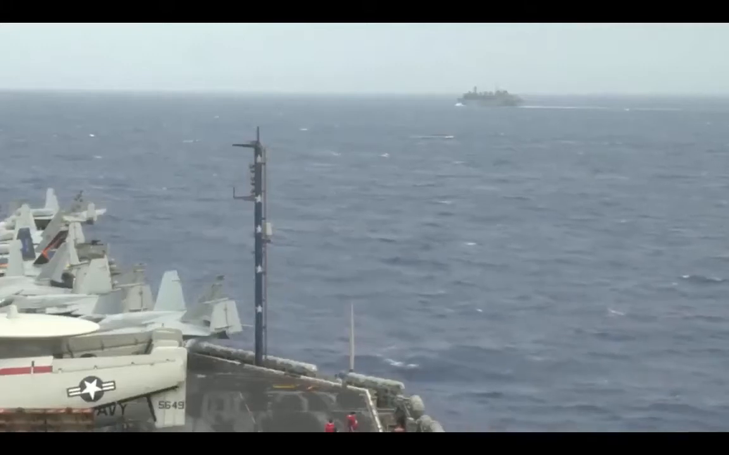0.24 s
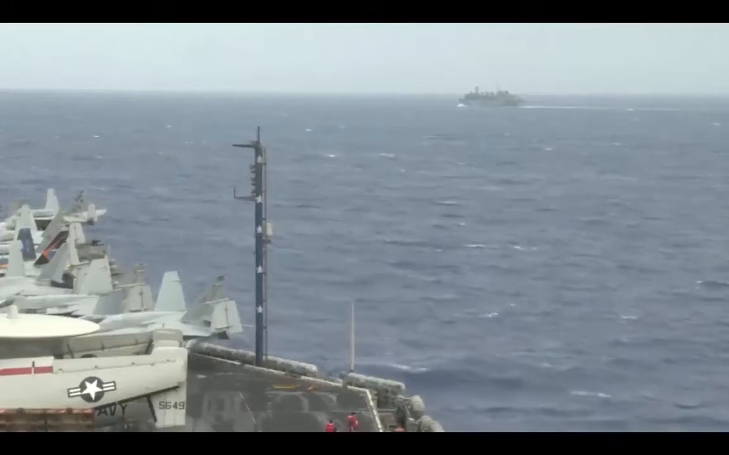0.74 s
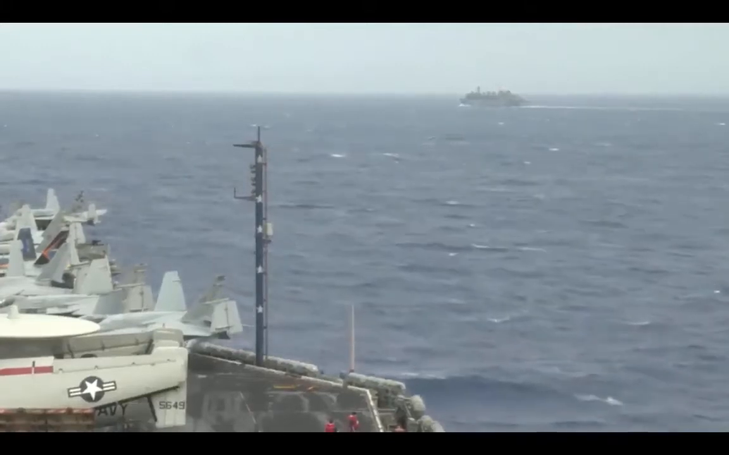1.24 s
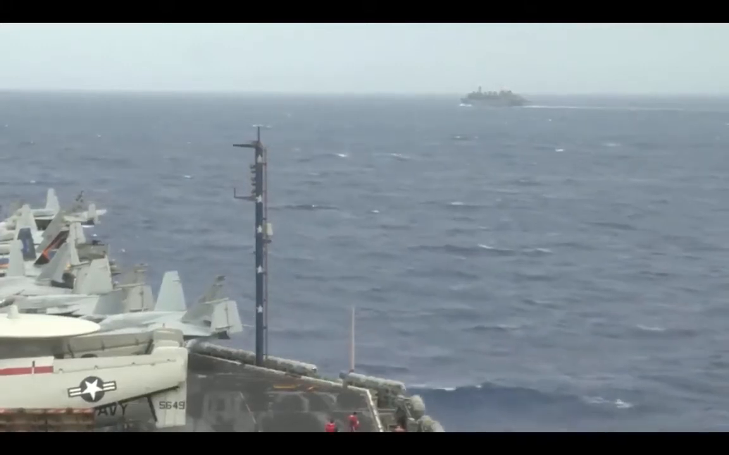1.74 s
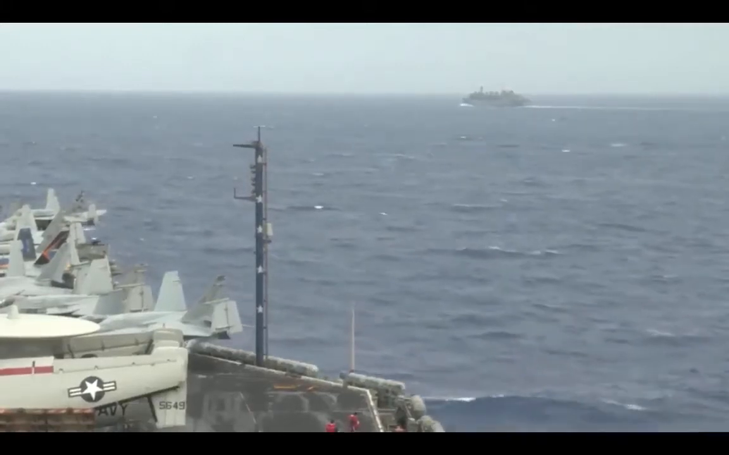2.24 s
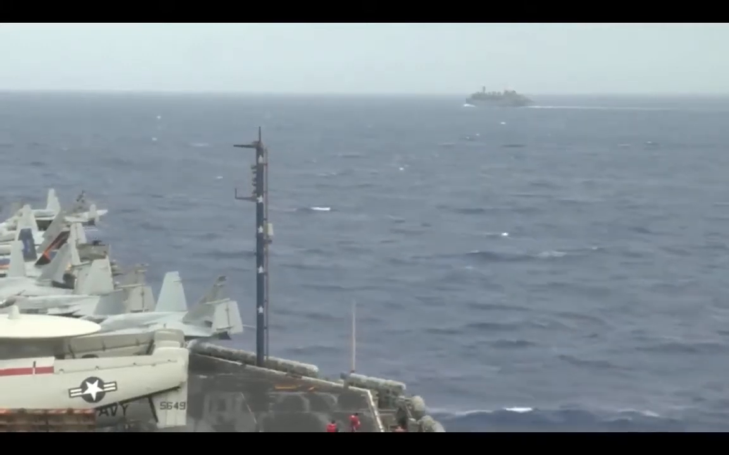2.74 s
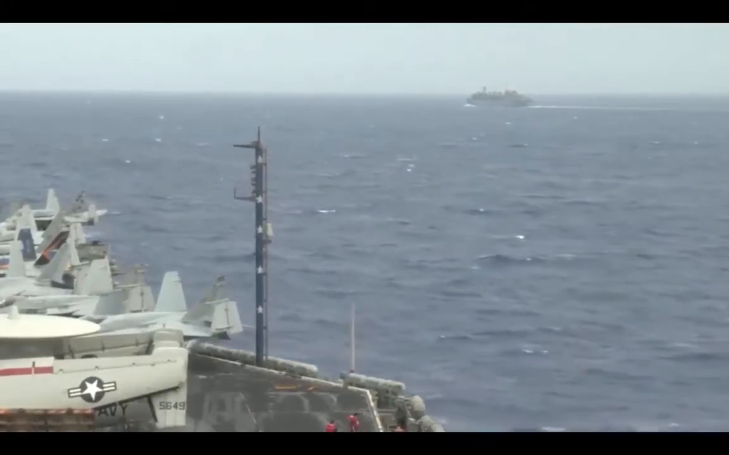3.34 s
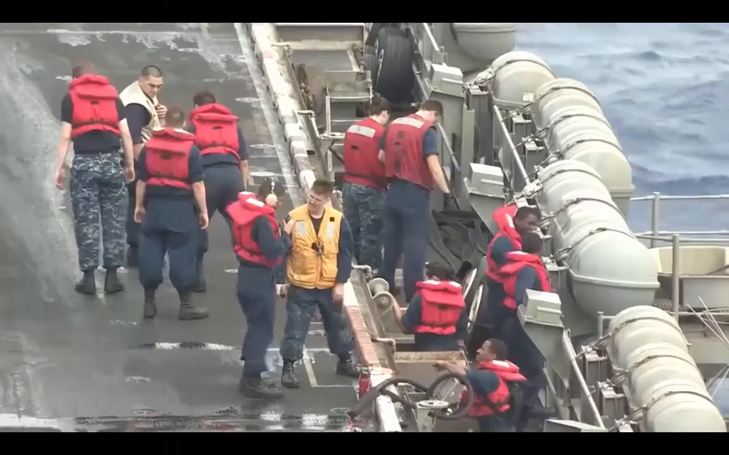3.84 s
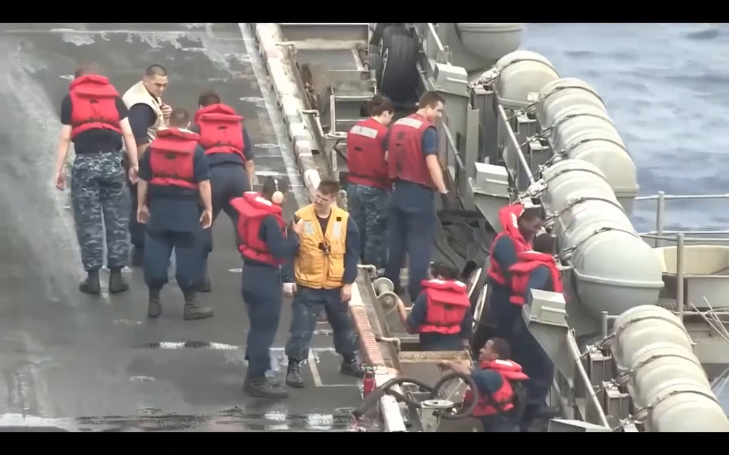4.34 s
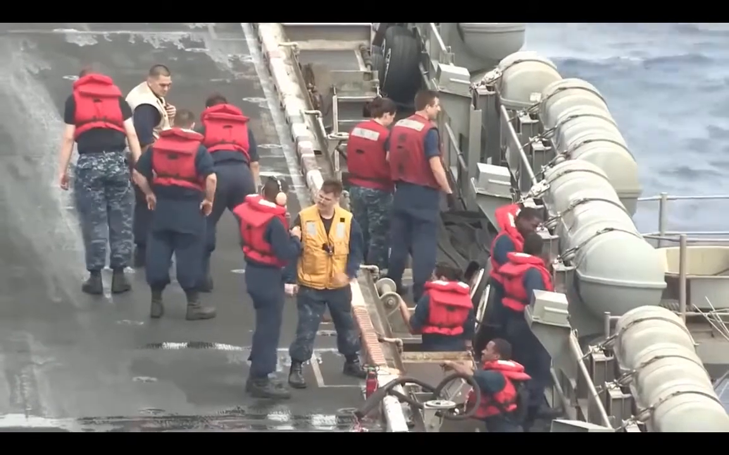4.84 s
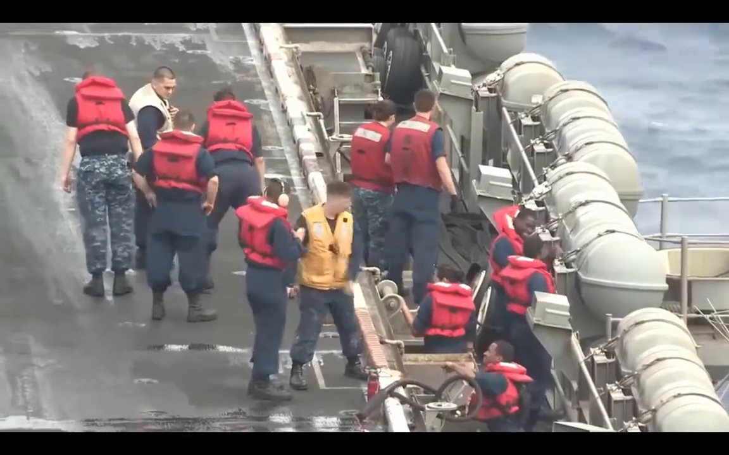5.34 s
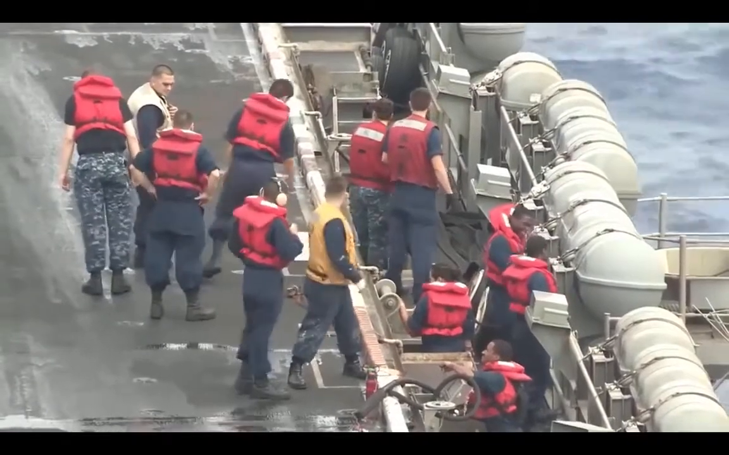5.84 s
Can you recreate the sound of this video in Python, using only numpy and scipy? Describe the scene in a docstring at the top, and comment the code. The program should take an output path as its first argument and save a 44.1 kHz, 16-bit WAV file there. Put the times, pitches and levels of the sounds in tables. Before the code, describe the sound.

Loud, gusty wind batters the microphone on a ship's deck, then gives way to soft rushing water and a faint hull hum.

```python
"""Strong wind on the deck of a ship under way batters a microphone. From the start, turbulent eddies
rumble, flutter and hiss on its grille; the biggest thump the diaphragm, and the stream tears off in
rough flaps. Near 3.85 s the scene changes, with a faint tick, to a sheltered spot where the sea rushes
along the humming hull. There a light wind eases, returns near 4.85 s with a soft puff and a second
tick, drops again under a faint, high swish, and builds with another puff near 5.7 s."""
import sys
import numpy as np
from scipy import signal
from scipy.fft import rfft, irfft
from scipy.io import wavfile
from scipy.ndimage import uniform_filter1d

SR = 44100
rng = np.random.default_rng(int(sys.argv[2]) if len(sys.argv) > 2 else 0)


def dump(signal):
    """Clip the signal to [-1, 1] and save it as 16-bit WAV at the path in sys.argv[1]."""
    limited = np.clip(np.atleast_2d(signal).T, -1, 1)
    pcm = np.round(limited * 32767).astype(np.int16)
    wavfile.write(sys.argv[1], SR, pcm)


N = 267990
TIME = np.arange(N) / SR
BIN_HZ = np.maximum(np.arange(N // 2 + 1) * SR / N, 1)

# Spectrum of the open wind. Each row: frequency in Hz, relative spectral density in dB.
GALE_SPECTRUM = [(20, -32), (45, -8), (85, -0.5), (160, -2.5), (290, -5.5), (400, -9.5), (600, -17.5),
                 (1500, -32.5), (2600, -38), (4200, -43.5), (6500, -50), (12000, -61.5), (15500, -70)]


def undb(db):
    """Amplitude ratio of a level in decibels."""
    return 10 ** (np.asarray(db) / 20)


def curve(table):
    """Linear interpolation of (time, value) rows at every sample."""
    return np.interp(TIME, *np.transpose(table))


def colour(spectrum):
    """Gain per frequency, interpolated from (Hz, dB) rows on logarithmic axes."""
    hz, db = np.transpose(spectrum)
    return undb(np.interp(np.log(BIN_HZ), np.log(hz), db))


def filtered(x, gain):
    """Linear filtering: the spectrum is multiplied by a gain per frequency."""
    return irfft(rfft(x) * gain, N)


def noise(gain):
    """Filtered Gaussian noise of rms 1."""
    x = filtered(rng.standard_normal(N), gain)
    return x / np.sqrt(np.mean(x ** 2))


def walk(rate_hz):
    """Random modulation of rms 1, band-limited to about the given rate."""
    return noise(1 / (1 + (BIN_HZ / rate_hz) ** 4))


def below(hz):
    """Fourth-order low-pass gain."""
    return 1 / np.sqrt(1 + (BIN_HZ / hz) ** 8)


def above(hz):
    """High-pass gain, complementary in power to the low-pass."""
    return np.sqrt(1 - below(hz) ** 2)


def steady(x, samples=1900):
    """Division by the running rms removes slow swells and keeps fast fluctuations."""
    return x / np.sqrt(uniform_filter1d(uniform_filter1d(x ** 2, samples), samples))


def swells(rows, attack_s=0.013, release_s=0.0022):
    """Envelope of (start, length, height) rows: linear rise, hold, exponential decay."""
    envelope = np.zeros(N)
    for start, length, height in rows:
        rise = np.clip((TIME - start) / attack_s + .5, 0, 1)
        envelope += height * rise * np.exp(-np.maximum(TIME - start - length, 0) / release_s)
    return envelope


def hull_drone():
    """Forced vibration: machinery shakes the hull, which hums unsteadily in narrow bands."""
    # Each row: centre in Hz, width in Hz, level in dB.
    bands = [(81, 11, -49), (151, 34, -50.5), (189, 14, -53.5), (260, 35, -49.5), (308, 20, -60),
             (402, 20, -53.5), (444, 32, -49), (558, 18, -55), (678, 37, -57.5), (863, 22, -60.5),
             (1134, 18, -62), (1567, 60, -68), (2450, 62, -68.5)]
    density = sum(undb(2 * db) / width / (1 + (2 * (BIN_HZ - hz) / width) ** 4)
                  for hz, width, db in bands)
    power = sum(undb(2 * db) for _, _, db in bands)
    return noise(np.sqrt(density)) * np.sqrt(power)


def sea(wash_db=1.3, froth_db=0.5, spray_hz=5200, flicker_db=.9, spray_follow=.4):
    """Flow noise: water washes and froths along the hull; its fine spray hangs on and swells less."""
    # Each row: time in seconds, level of the water in dB.
    levels = [(3.85, -40.5), (4.05, -42.5), (4.26, -39), (4.41, -40.5), (4.46, -44.5), (4.52, -39.5),
              (4.68, -42.5), (5.28, -43), (5.36, -41), (5.51, -42), (5.69, -45), (5.75, -42), (5.81, -48),
              (5.87, -41.5), (6.08, -47.5)]
    # Each row: frequency in Hz, relative spectral density in dB.
    spectrum = [(20, -38), (50, -31), (76, -8), (110, -3.5), (260, 1.5), (450, -2), (700, -3.5),
                (1050, -10.5), (1700, -12), (2500, -16.5), (4200, -22), (9000, -36), (10700, -39),
                (13000, -42), (15500, -47.5)]
    sea_db = curve(levels)
    water = steady(noise(colour(spectrum)) * undb(wash_db * walk(28) + froth_db * walk(400)))
    spray = filtered(water, above(spray_hz))
    spray_db = flicker_db * walk(16) - (1 - spray_follow) * (sea_db - sea_db.mean())
    return (water + spray * (undb(spray_db) - 1)) * undb(sea_db)


def swish(peak_s=5.607, spread_s=.028, centre_hz=12600, width_hz=2200, level_db=-77):
    """Band-limited noise under a Gaussian envelope is heard as one faint, very high hiss."""
    band = noise(1 / (1 + (2 * (BIN_HZ - centre_hz) / width_hz) ** 4))
    return band * undb(level_db) * np.exp(-.5 * ((TIME - peak_s) / spread_s) ** 2)


def ticks(decay_s=0.00013):
    """A step that dies at once has a broad spectrum and is heard as a tick: one as the scene changes, one later
    in the shelter."""
    # Each row: time in seconds, peak level in dB.
    steps = [(3.8435, -37), (4.8613, -34.5)]
    return sum(undb(db) * np.sign(TIME - s) * np.exp(-np.abs(TIME - s) / decay_s) for s, db in steps)


def breeze(churn_db=2.5):
    """Weak turbulence: light wind builds and eases as low-pitched pressure noise at the microphone."""
    # Each row: time in seconds, level of the wind in dB.
    levels = [(3.85, -39), (4.1, -43.5), (4.45, -50), (4.82, -57), (4.9, -36.5), (5.0, -39.5), (5.2, -35.5),
              (5.29, -34.5), (5.35, -49), (5.44, -43), (5.5, -52), (5.58, -48), (5.69, -45), (5.72, -34.5),
              (5.87, -32.5), (5.96, -33.5), (6.01, -40.5), (6.06, -32.5)]
    # Each row: frequency in Hz, relative spectral density in dB.
    spectrum = [(20, -6), (45, -4), (70, -3.5), (110, 0.5), (200, 0), (300, -5.5), (550, -10.5),
                (1000, -21.5), (2000, -34), (6000, -58), (15500, -80)]
    return steady(noise(colour(spectrum)) * undb(churn_db * walk(26))) * undb(curve(levels))


def puffs(spread_s=0.018):
    """Forced oscillation: slow eddies in the shelter rock the diaphragm for a few soft cycles."""
    # Each row: time in seconds, peak level in dB, swing frequency in Hz.
    eddies = [(4.85, -32.5, 113), (5.735, -30.5, 103.2)]
    pressure = np.zeros(N)
    for (s, db, hz), phase in zip(eddies, rng.random(len(eddies))):
        envelope = np.exp(-.5 * ((TIME - s) / spread_s) ** 2)
        pressure += undb(db) * envelope * np.sin(2 * np.pi * (hz * TIME + phase))
    return pressure


def lulls(onset_s=0.043, recovery_s=0.012):
    """Attenuation in dB as the flow stalls: the air speed sags slowly and snaps back."""
    # Each row: time of the extreme in seconds, depth in dB (negative for a lift).
    dips = [(.15, 1.5), (.87, 0.5), (0.995, 3), (1.34, -1.5), (1.655, 0), (2.136, 6.5), (2.405, 7),
            (3.697, 4.5), (3.838, 3.5), (5.455, 4.5)]
    return sum(db * np.exp(-((TIME - s) / np.where(TIME < s, onset_s, recovery_s)) ** 2)
               for s, db in dips)


def shelter():
    """Superposition out of the gale: sea, breeze and drone dip together under the puffs and swish."""
    return (sea() + breeze() + hull_drone()) * undb(-lulls()) + puffs() + swish()


def grille_hiss(surge_db, flow_db, base_db=-42.5, grit_db=1.0, fizz_db=1.6, brighten=0.08):
    """Fine turbulence hisses in the grille; the finest eddies grow fastest with the air speed."""
    # Slow drift apart from the wind. Each row: time in seconds, lift in dB.
    drift = [(0, 2.5), (.55, 0.5), (.7, -2), (1.0, 0), (1.22, 1.5), (1.6, 1), (2.2, 0.5), (2.62, 2),
             (2.85, 1), (3.25, 1), (3.8, 2)]
    # Jets cutting straight through the grille. Each row: time and spread in seconds, treble lift in dB.
    jets = [(0.297, 0.011, 5), (0.897, .008, 1), (1.211, .009, 3.5), (1.41, 0.0083, 5), (2.05, .012, 1),
            (2.19, .016, 2.5), (2.655, .025, 1.5), (3.294, .006, 2), (3.394, 0.0091, 4.5)]
    lift_db = flow_db + curve(drift)
    hiss = steady(noise(colour(GALE_SPECTRUM) * above(1600)) * undb(surge_db - grit_db * walk(640)))
    fizz_lift_db = brighten * lift_db + fizz_db * walk(23)  # the finest also come and go on their own
    hiss += filtered(hiss, above(9100)) * (undb(fizz_lift_db) - 1)
    jet_db = sum(db * np.exp(-.5 * ((TIME - s) / spread) ** 2) for s, spread, db in jets)
    hiss += filtered(hiss, above(4500)) * (undb(jet_db) - 1)
    return hiss * undb(base_db + lift_db)


def flaps(trim_db=-3.0, low_hz=430, dull_hz=1400):
    """Flow separation: the stream tears off the edge of the grille in short, rough bursts."""
    # Each row: start in seconds, length in seconds, level in dB before the trim.
    separations = [(0.011, .012, -24), (0.235, 0.0066, -19), (0.29, 0.024, -17.5), (0.585, 0.022, -22),
                   (0.728, .01, -24), (0.896, 0.022, -25), (1.352, 0.0064, -28), (1.465, 0.013, -26),
                   (1.505, .008, -26), (1.664, 0.0087, -25), (1.695, 0.015, -25), (2.018, 0.011, -24),
                   (2.149, 0.018, -21), (2.441, 0.013, -18.5), (2.513, .022, -23), (2.601, 0.0065, -15.5),
                   (2.741, .012, -15), (2.863, 0.016, -22), (3.03, 0.021, -22), (3.086, 0.022, -17.5),
                   (3.254, .014, -22.5), (3.376, 0.01, -16.5), (3.711, 0.007, -20.5)]
    band = colour(GALE_SPECTRUM) * above(low_hz) / np.hypot(1, BIN_HZ / dull_hz)
    bursts = [(start, length, undb(db + trim_db)) for start, length, db in separations]
    return steady(noise(band), samples=400) * swells(bursts, attack_s=0.0014, release_s=0.002)


def thumps(trim_db=-3, rise_s=0.0021):
    """Impulsive forcing: big eddies swing the diaphragm. Gives the pressure and how fully they cover it."""
    # Each row: time in seconds, peak in dB before the trim, swing frequency in Hz, fall in seconds.
    impacts = [(0.005, -6.5, 190, 0.0024), (0.017, -4.5, 140, 0.0028), (0.186, 1, 105, 0.0042),
               (0.198, 3, 150, 0.002), (0.237, -3, 184, .003), (0.288, 0, 114, 0.0065),
               (0.589, -0.5, 140, 0.0025), (0.779, -3, 149, 0.006), (0.9, 2.5, 188, 0.0022),
               (1.008, -4, 119, 0.0082), (1.351, -11.5, 210, 0.0022), (1.403, 0, 166, 0.0017),
               (1.416, -1.5, 128, 0.0053), (1.465, -1, 189, 0.002), (1.535, -6, 160, 0.0041),
               (1.785, -6, 190, 0.0022), (1.945, -3.5, 196, 0.0024), (2.013, -5.5, 236, 0.0022),
               (2.161, -2.5, 138, 0.004), (2.263, -2, 169, 0.0024), (2.463, -2.5, 123, 0.0043),
               (2.519, 1.5, 190, 0.0017), (2.546, 0.5, 150, 0.0023), (2.698, 6.5, 149, 0.0011),
               (2.74, -2, 207, .004), (2.877, 1.5, 153, .003), (2.941, -1.5, 150, 0.0026),
               (3.095, 1, 149, .004), (3.203, -3.5, 162, 0.0039), (3.219, 0.5, 190, 0.0015),
               (3.356, 0.5, 145, 0.0021), (3.385, -2.5, 160, .003), (3.459, -2.5, 140, .003),
               (3.615, 0, 198, 0.0016), (3.712, 0, 186, 0.0041)]
    pressure, cover = np.zeros(N), np.zeros(N)
    for (s, db, hz, fall_s), phase in zip(impacts, rng.random(len(impacts))):
        near = np.abs(TIME - s) < .05
        t = TIME[near] - s
        shove = np.exp(-.5 * (t / np.where(t < 0, rise_s, fall_s)) ** 2)
        pressure[near] += undb(db + trim_db) * shove * np.sin(2 * np.pi * (hz * t + phase))
        cover[near] += shove
    return pressure, cover


def gale(rumble_db=-17.5, flutter_db=-27, wake_db=3.0, lull_share=0.5, hiss_growth=0.29, hiss_bite=0.39,
         rumble_churn_db=2.5, flutter_churn_db=2.14, hiss_churn_db=1.23, ride_db=0.6):
    """Turbulent cascade: large eddies rumble, and the small ones they carry flutter and hiss in bursts."""
    # Each row: time in seconds, strength of the wind in dB about its usual level.
    strength = [(0, -2), (.38, 2), (.46, -3), (.52, 0), (.7, -1.5), (.84, -3.5), (1.18, -4), (1.32, -5),
                (1.5, -4.5), (1.85, -0.5), (1.92, -3), (2.2, -0.5), (2.33, -2.5), (2.46, 2.5), (2.8, 1.5),
                (3.0, 3), (3.14, 0), (3.45, 3), (3.8, -2)]
    # Each row: start and length in seconds, lift in dB, extra bite of the small eddies in dB.
    gusts = [(0.0, 0.017, 5.5, -3.5), (0.162, 0.052, 2, -4.5), (0.226, 0.023, 3.5, -2.5),
             (0.28, 0.015, 5.5, -2.5), (0.294, 0.023, 5.5, -4.5), (0.34, .045, 1, -2), (0.57, 0.039, 3, -2),
             (0.884, 0.027, 1.5, 0.5), (1.2, 0.016, -3.5, 4.5), (1.358, 0.067, 5.5, -1),
             (1.448, 0.052, 4.5, 1), (1.5, 0.089, 6, -1.5), (1.685, 0.1, 4, -1), (2.149, 0.06, 1, 4),
             (2.211, 0.035, 2.5, 3), (2.445, 0.02, 4, -6), (2.501, 0.041, 5, -1.5), (2.591, 0.1, -0.5, 3),
             (2.689, 0.019, 5.5, -1.5), (2.741, 0.019, 5, 0.5), (2.839, 0.036, 1.5, 2.5),
             (3.017, 0.035, 1.5, 1.5), (3.076, 0.031, 3.5, -3), (3.101, 0.011, 4, 3.5), (3.36, 0.06, 2, -2),
             (3.371, 0.041, 1, 3.5), (3.442, 0.011, -2, 7), (3.517, 0.019, 1, 2.5), (3.59, 0.069, 3, 0.5),
             (3.7, 0.13, 1.5, 0.5)]
    wind_db = curve(strength) + swells((s, length, lift) for s, length, lift, _ in gusts)
    bite_db = swells((s, length, bite) for s, length, _, bite in gusts)
    lull_db = lulls()
    # A lull stops the air in the grille, while the larger eddies partly roll on.
    eddy_db = wind_db - lull_share * lull_db
    grille_db = hiss_growth * wind_db + hiss_bite * bite_db - lull_db
    blows, cover = thumps()
    shape = colour(GALE_SPECTRUM)
    churn = walk(31.7)  # all sizes of eddy surge together
    rumble = steady(noise(shape * below(349)) * undb(rumble_churn_db * churn))
    swing_db = ride_db * np.tanh(rumble)  # each pressure swing speeds or slows the air in the grille
    flutter = steady(noise(shape * above(448) * below(1710)) * undb(flutter_churn_db * churn + swing_db))
    hiss = grille_hiss(hiss_churn_db * churn + swing_db, grille_db)
    # A big eddy displaces the rumble while it covers the microphone, and drags small eddies in its wake.
    rumble *= np.sqrt(1 - np.minimum(cover, 1) ** 2) * undb(rumble_db + eddy_db)
    flutter *= undb(flutter_db + eddy_db + bite_db + wake_db * cover)
    return blows + rumble + flutter + flaps() + hiss


def scene(shelter_s=3.838, fade_s=0.017):
    """A quick linear crossfade leads from the open deck to the shelter."""
    sheltered = np.clip((TIME - shelter_s) / fade_s + .5, 0, 1)
    return ((1 - sheltered) * gale() + sheltered * shelter() + ticks())[None]


def record(dry, low_cut_hz=43, ceiling=.74, top_hz=15700):
    """Cavity resonance colours the treble, saturation rounds the hardest blows, filters limit the band."""
    # Resonances behind the microphone grille. Each row: centre in Hz, width in Hz, gain in dB.
    resonances = [(2600, 310, 2), (4260, 840, -3), (5280, 880, 2.5), (5780, 360, -3), (6140, 150, -0.5),
                  (12100, 650, 0.5)]
    cavity_db = sum(db / (1 + (2 * (BIN_HZ - hz) / width) ** 2) for hz, width, db in resonances)
    low_cut = signal.butter(2, low_cut_hz, "high", fs=SR, output="sos")
    heard = signal.sosfilt(low_cut, filtered(dry, undb(cavity_db)))
    rounded = heard / (1 + (heard / ceiling) ** 6) ** (1 / 6)
    return signal.sosfilt(signal.ellip(10, .2, 80, top_hz, fs=SR, output="sos"), rounded)


dry = scene()
out = record(dry)
dump(out)
```